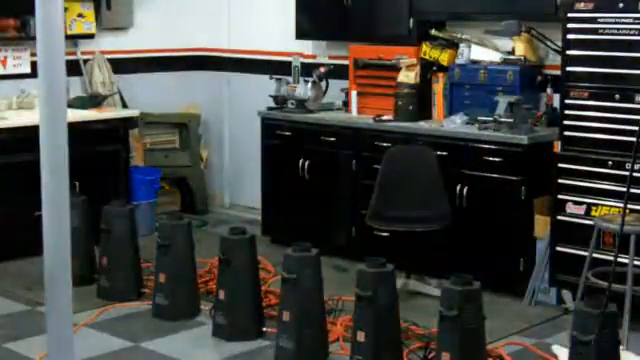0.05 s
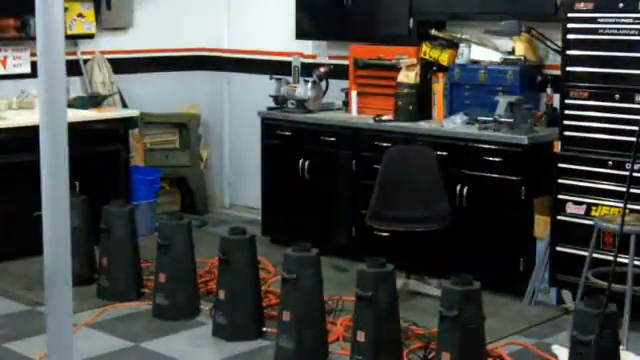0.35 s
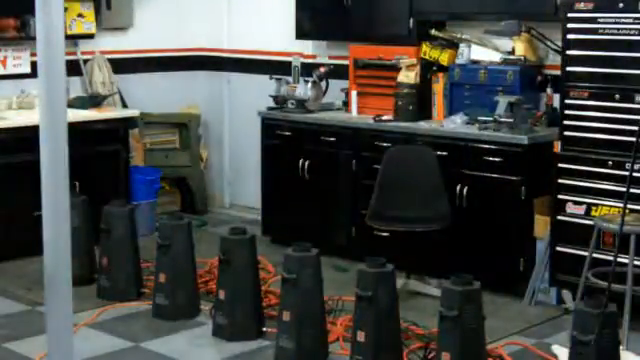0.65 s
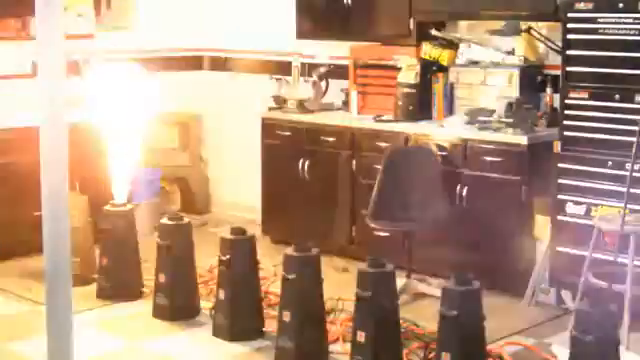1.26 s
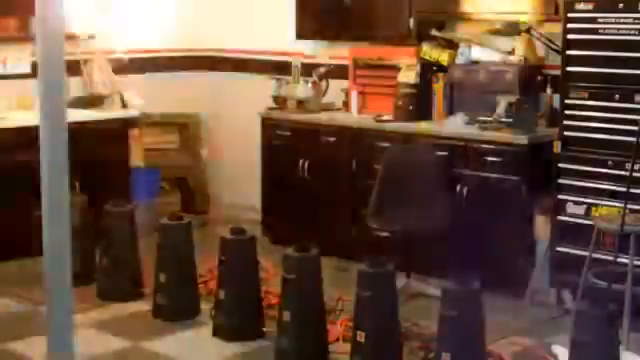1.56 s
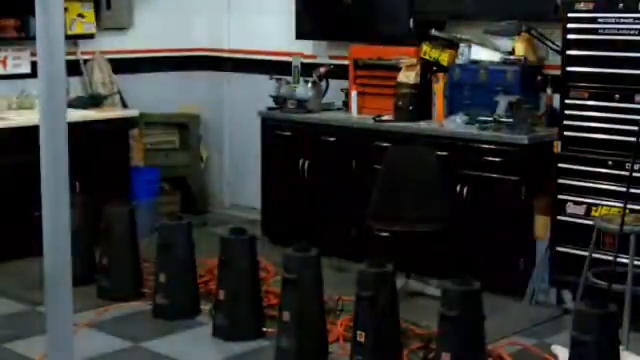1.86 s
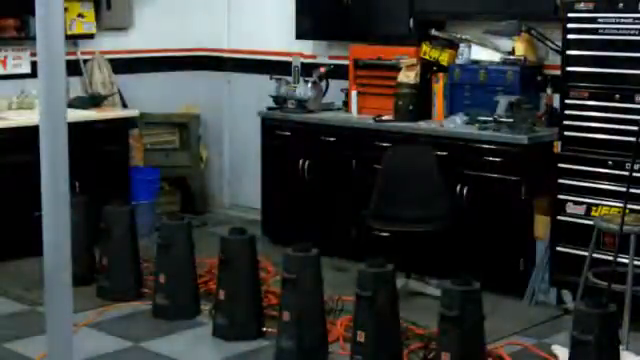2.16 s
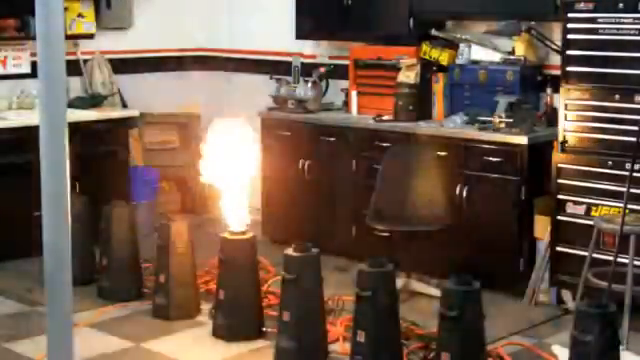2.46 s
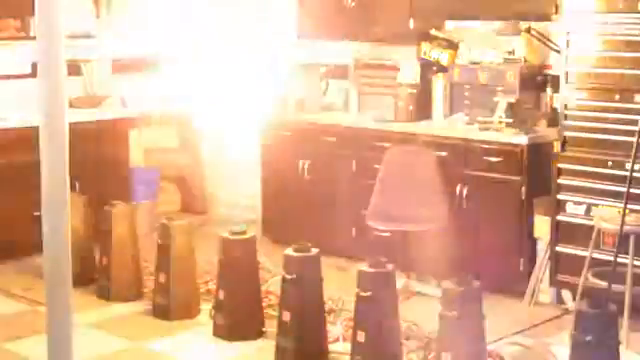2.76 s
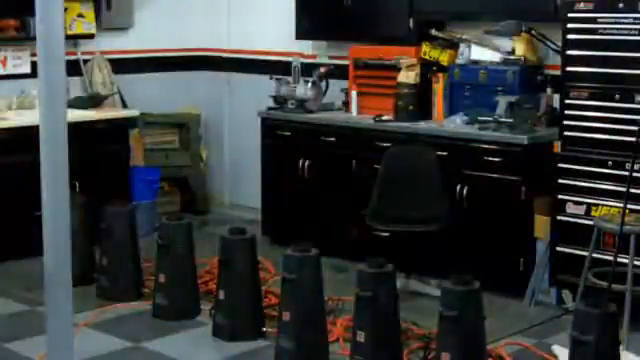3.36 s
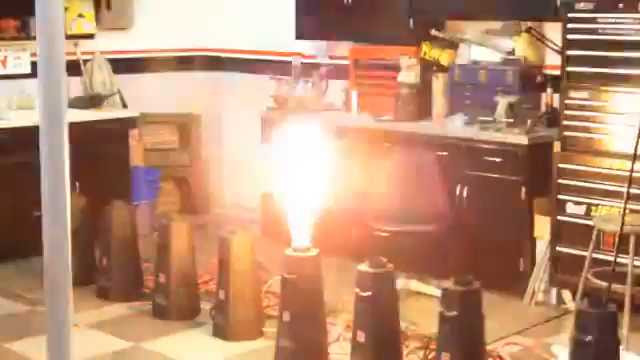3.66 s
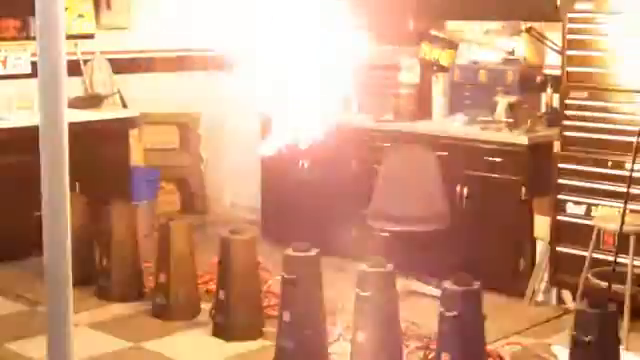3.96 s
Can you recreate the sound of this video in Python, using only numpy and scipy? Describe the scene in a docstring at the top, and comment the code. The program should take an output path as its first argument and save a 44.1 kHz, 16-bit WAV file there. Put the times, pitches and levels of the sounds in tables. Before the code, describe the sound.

Gas flame jets fire three loud, short bursts over low garage hum, at about 1.2, 2.5 and 3.7 seconds, each preceded by soft pilot puffs. Each starts with a spit, pop and thud, then hisses and roars for under half a second, echoing off hard walls. The first two end in brief sputtering hoots, near 1.6 and 2.9 seconds; the second also whistles and leaves faint metal ringing.

```python
"""Three propane flame units fire in turn, centred before the microphone in a hard-walled garage.
A pilot puffs alight; the valve opens with a spit, the jet hisses, and the gas catches with a pop
and a thud, then roars and swells. The first two burner tubes hoot as their flames starve;
the second unit also whistles and leaves its metal ringing.
The walls answer each burst, and a low room hum lies behind it all."""
import sys
import numpy as np
from scipy import signal
from scipy.fft import rfft, irfft
from scipy.io import wavfile

SR = 44100
rng = np.random.default_rng(int(sys.argv[2]) if len(sys.argv) > 2 else 0)


def transcribe(u):
    """Save the signal u as a 16-bit wav file named by the first command-line argument.

    u: samples, shape (n,) or (channels, n), limited to [-1, 1]; the rate is SR.
    q: integer samples, one column per channel.
    """
    v = np.clip(np.atleast_2d(u).T, -1, 1)
    q = np.round(v * 32767).astype(np.int16)
    wavfile.write(sys.argv[1], SR, q)


N = 176400
FLUTTER_HZ, FLUTTER_DB, CRACKLE_HZ, CRACKLE_DB = 42.4, 3.5, 400, 0.5
IGNITE_S = 0.011

# One burst per unit (valve opens [s], valve shuts [s], hiss [dB], spit [dB], rasp [dB], roar [dB],
# rumble [dB], whistle [dB], whump [dB], swell [dB], rise [s], pop [dB], rasp flare [dB])
UNIT_BURSTS = [(1.243, 1.593, -32.5, -22.5, -46, -44, -26, -72, -33.5, -35, 0.007, -32, -7),
               (2.507, 2.861, -32.5, -31, -42, -40, -31.5, -41, -34, -32.5, 0.0053, -39, 7),
               (3.7054, 4.05, -32, -24, -46.5, -41.5, -35.5, -80, -33.5, -71, 0.0048, -33, 13)]
# Spectra of the burning gas (frequency [Hz], level [dB])
ROAR_SPECTRUM = [(60, 2.5), (110, -4), (269, -12), (354, -3.5), (543, -8), (707, -13), (885, -16),
                 (1000, -5.5), (1120, -16), (1250, -15), (1620, -19), (2750, -120)]
RASP_SPECTRUM = [(650, 5.5), (1100, -11.5), (1510, -6), (1640, -4), (2630, -1), (2850, -7), (3440, -6),
                 (4100, -11), (5330, -55), (9020, -120)]
RUMBLE_SPECTRUM = [(8.2, -40), (14, 10.5), (25, 11), (45, -14), (70, -14.5), (97, -13.5), (130, -40.5),
                   (170, -73), (290, -120)]
WHUMP_SPECTRUM = [(40, 3), (95, -1.5), (160, -7), (260, -11.5)]
FIREBALL_SPECTRUM = [(40, -0.5), (130, -5), (190, -9.5), (270, -6.5), (450, -15), (600, -17.5)]
# Resonances of each burner tube under its flame (frequency [Hz], width [Hz], level [dB])
TUBE_1_MODES = [(727, 59, 3.5), (783, 35, -12), (1020, 47, -1)]
TUBE_2_MODES = [(716, 24, -2.5), (820, 18, 0.5), (947, 12.5, 5.5)]
TUBE_3_MODES = [(745, 42, 2), (795, 76, 5), (980, 43, -3)]
# Each fireball at its fullest (time [s], spread [s])
FIREBALL_PEAKS = [(1.59, 0.083), (2.84, 0.1), (4.05, .09)]

def flames():
    """Each flame catches with a whump, roars in its tube, rasps, rumbles and swells into a fireball."""
    linger_s, flare_s, whump_s = 0.056, 0.051, 0.098
    flutter = flicker(FLUTTER_HZ, FLUTTER_DB)
    roar, fireball = coloured(ROAR_SPECTRUM), coloured(FIREBALL_SPECTRUM) * flutter
    rasp = coloured(RASP_SPECTRUM) * flicker(CRACKLE_HZ, CRACKLE_DB)
    rumble, whump = coloured(RUMBLE_SPECTRUM), coloured(WHUMP_SPECTRUM)
    tubes = (TUBE_1_MODES, TUBE_2_MODES, TUBE_3_MODES)
    bright, deep = 0, 0
    for burst, tube, (peak, spread) in zip(UNIT_BURSTS, tubes, FIREBALL_PEAKS):
        start, stop, _, _, rasp_db, roar_db, rumble_db, _, whump_db, swell_db, _, _, flare_db = burst
        age = np.clip(clock() - start, 0, stop - start)
        flare = np.exp(-age / flare_s)
        swell = (clock() > start) / np.cosh((clock() - peak) / spread)
        burner = (roar + undb(-1.5) * resonant(tube)) * flutter
        bright += undb(roar_db + 6 * flare) * gate(start, stop + linger_s, IGNITE_S, fall=0.043) * burner
        bright += undb(rasp_db + flare_db * flare) * gate(start, stop, IGNITE_S, fall=0.089) * rasp
        deep += undb(rumble_db) * gate(start, stop + linger_s, rise=0.0089, fall=0.16) * rumble
        deep += undb(whump_db) * gate(start, start + whump_s, rise=0.041, fall=whump_s) * whump
        deep += undb(swell_db) * swell * fireball
    return bright, deep


# Spectra of the opening spit and of each nozzle's hiss (frequency [Hz], level [dB])
SPIT_SPECTRUM = [(300, 6), (800, 0), (1300, -31), (1900, -5.5), (3700, -18), (4800, -9.5), (6200, 10),
                 (8000, -2.5), (9300, -5), (10600, -0.5), (12300, -19)]
HISS_1_SPECTRUM = [(2760, -23), (4700, -21), (5230, -15.5), (5690, 0), (6040, 4), (6680, -3.5), (7710, -3),
                   (8760, -16), (9720, -19.5), (12200, -19), (15900, -48), (22000, -120)]
HISS_2_SPECTRUM = [(2760, -54), (4700, -15.5), (5000, -19.5), (5270, -5.5), (5850, 1), (7120, -7.5),
                   (7730, 2.5), (9080, -10.5), (10100, -13.5), (12000, -27.5), (15600, -56), (22000, -120)]
HISS_3_SPECTRUM = [(2760, -31), (4700, -16), (5050, -13), (5400, -10), (5850, 2), (6620, -7), (7650, -0.5),
                   (8020, -2.5), (8830, -15), (12200, -26), (15900, -58), (22000, -120)]
# Whistle and ring that all the nozzles share (frequency [Hz], width [Hz], level [dB])
WHISTLE_MODES = [(1696, 28, -3.5), (1970, 20, 4.5), (2080, 120, -8.5), (2770, 70, -5), (3097, 31, -7),
                 (3620, 47, -15)]
NOZZLE_MODES = [(2636, 63, -10), (5945, 79, -3.5), (5940, 59, -13.5), (6130, 24, -0.5), (6420, 63, 1),
                (6950, 29, 3.5), (7500, 51, 3.5), (7870, 38, 3.5)]
# Sharp snaps in the jet as it ignites (time [s], level [dB])
JET_SNAPS = [(1.247, -30), (1.263, -15.5), (2.57, -25), (3.715, -18), (3.7234, -15), (3.752, -33)]

def jets():
    """Gas leaves each nozzle: a spit with snaps, then hiss and whistle that settle with the pressure."""
    surge_db, surge_s, spit_s, snap_s = 5.5, 0.045, 0.014, 0.0005
    spit, whistle = coloured(SPIT_SPECTRUM), resonant(WHISTLE_MODES)
    ring = undb(-4) * resonant(NOZZLE_MODES)
    spray = spit * flicker(CRACKLE_HZ, CRACKLE_DB)
    gas = 0
    for burst, nozzle in zip(UNIT_BURSTS, (HISS_1_SPECTRUM, HISS_2_SPECTRUM, HISS_3_SPECTRUM)):
        start, stop, hiss_db, spit_db, _, _, _, whistle_db, _, _, rise, _, _ = burst
        surge = undb(surge_db * np.exp(-np.maximum(clock() - start, 0) / surge_s))
        flow = gate(start, stop, rise, fall=0.048) * surge
        gas += flow * (undb(hiss_db) * (coloured(nozzle) + ring) + undb(whistle_db) * whistle)
        gas += undb(spit_db) * gate(start, start + spit_s, rise, spit_s) * spray
    snaps = sum(undb(db) * gate(at, at + snap_s, snap_s / 2, snap_s) for at, db in JET_SNAPS)
    return gas * flicker(FLUTTER_HZ, db=0.5) + snaps * spit


# Crack of the gas catching (frequency [Hz], level [dB])
POP_SPECTRUM = [(200, 17), (400, -7.5), (560, -10), (710, -6), (1100, -8.5), (1900, -1.5), (2700, -18.5),
                (3600, -13)]

def ignitions():
    """Each cloud of gas catches with a short pop."""
    pops = sum(undb(pop_db) * gate(start, start + 0.0083, rise, fall=0.029)
               for start, *_, rise, pop_db, _ in UNIT_BURSTS)
    return pops * coloured(POP_SPECTRUM)


# Thuds just after ignition (time [s], frequency [Hz], level [dB])
AIR_THUMPS = [(1.261, 90, -30), (2.53, 63.3, -21.5), (3.765, 96, -22.5)]

def thumps(length_s=0.014):
    """The expanding gas pushes the air, reaching the microphone as a short, deep thud."""
    thuds = 0
    for at, hz, db in AIR_THUMPS:
        envelope = gate(at, at + length_s, rise=length_s / 2, fall=length_s)
        thuds += undb(db) * envelope * np.sin(2 * np.pi * hz * (clock() - at))
    return thuds


# Notes of the burner tubes (time [s], length [s], frequency [Hz], level [dB], throb depth [0-1])
TUBE_HOOTS = [(1.614, 0.025, 767, -32, 0.42), (1.697, 0.046, 802, -43, 0.3),
              (1.745, 0.014, 811.4, -32.5, 0.06), (2.875, 0.031, 770.4, -29, 0.4),
              (2.923, 0.021, 795, -28, 0.4)]

def hoots():
    """The starving flame sputters, so its tube hoots on a throbbing, wavering note."""
    waver_hz, waver_depth, throb_hz = 80.1, 0.0511, 81.3
    drift_s = np.cumsum(waver_depth * wander(waver_hz)) / SR
    notes = 0
    for at, length, hz, db, depth in TUBE_HOOTS:
        age = clock() - at
        throb = 1 - depth * np.cos(2 * np.pi * throb_hz * age)
        tone = np.sin(2 * np.pi * hz * (age + drift_s))
        notes += undb(db) * gate(at, at + length, rise=0.0032, fall=0.019) * throb * tone
    return notes * flicker(FLUTTER_HZ, FLUTTER_DB / 2)


# Pilot flames catching (time [s], decay [s], level [dB])
PILOT_PUFFS = [(0.948, 0.033, -46), (1.07, 0.021, -64), (1.205, 0.032, -60.5), (2.183, 0.035, -54.5),
               (3.356, 0.04, -49), (3.521, 0.048, -50), (3.578, 0.038, -50.5)]
# Spectrum of a puff (frequency [Hz], level [dB])
PILOT_SPECTRUM = [(100, 7), (200, -2.5), (400, 5), (600, 7.5), (1000, 2), (1600, -10.5), (3300, -43),
                  (6000, -86)]

def pilots():
    """Pilot flames puff softly alight ahead of each burst."""
    puffs = sum(undb(db) * gate(at, at + IGNITE_S, rise=0.0038, fall=decay)
                for at, decay, db in PILOT_PUFFS)
    return puffs * coloured(PILOT_SPECTRUM)


# Metal of the second unit (frequency [Hz], time to fall 60 dB [s], level [dB])
METAL_MODES = [(1950, 0.36, -62), (2527, 1.9, -51.5), (2513.5, 1.1, -69), (3074, 1.14, -55.5),
               (10096, 0.33, -66)]

def metal():
    """The jet shakes the second unit's metal, which rings on after the valve shuts."""
    start_s, release_s = UNIT_BURSTS[1][0], 2.94
    ring = 0
    for hz, t60, db in METAL_MODES:
        envelope = gate(start_s, release_s, rise=0.12, fall=t60 / np.log(1000))
        ring += undb(db) * envelope * np.sin(2 * np.pi * hz * clock())
    return ring


# Reverberation of the garage (frequency [Hz], time to fall 60 dB [s])
GARAGE_DECAY = [(100, 1), (800, 0.68), (2500, 0.84), (6000, 0.74), (8000, 0.49), (11000, 0.093)]

def garage(source):
    """The hard walls send a dense tail back to the microphone; it dies sooner in the treble."""
    hz, t60 = np.array(sorted(GARAGE_DECAY), float).T
    white, tail = rfft(rng.standard_normal(N)), 0
    for share, seconds in zip(np.eye(len(hz)), t60):
        decay = np.exp(-np.log(1000) * clock() / seconds)
        band = irfft(white * np.interp(np.log(bins()), np.log(hz), share), N)
        tail += band * decay / np.linalg.norm(decay)
    return undb(-1) * signal.fftconvolve(source, tail)[:N]


# Hum of the garage and self-noise of the microphone (frequency [Hz], level [dB])
ROOM_HUM = [(11, -16.5), (18, -2.5), (22, -8), (32, -20), (51, -11), (71, -9.5), (82, -28), (107, -25),
            (140, -23), (163, -40), (213, -33.5), (259, -37), (290, -34.5), (514, -43.5), (720, -43),
            (940, -34.5), (1120, -41), (1300, -39), (1680, -46.5), (1900, -43.5), (2450, -53),
            (2780, -48.5), (3500, -57), (4550, -150)]
MIC_HISS = [(2760, -113), (4700, -15.5), (5010, -2.5), (5960, 3.5), (6720, -3), (7440, -7), (8290, -11.5),
            (9390, -10.5), (12300, -12.5), (16000, -48), (22000, -120)]
# Faint high ticks in the room (time [s])
ROOM_TICKS = [.12, .22, .615, .725, 1.13, 2.03, 2.221, 3.22, 3.535]

def room_tone():
    """The garage's hum and the microphone's own thin hiss, with a drone and ticks in the centre."""
    hum_db, hiss_db, side_db, tick_s = -47, -69, -14.5, 0.011
    pulses = sum(np.exp(-((clock() - at) / tick_s) ** 2) for at in ROOM_TICKS)
    ticks = undb(-74.5) * pulses * resonant([(9400, 590, 0)])
    drone = undb(-53) * resonant([(69, 4, 0)])
    mid, side = (undb(hum_db) * coloured(ROOM_HUM) + undb(hiss_db) * coloured(MIC_HISS)
                 for _ in range(2))
    return mid + drone + ticks, undb(side_db) * side


def undb(db):
    """Decibels to gain."""
    return 10 ** (np.asarray(db) / 20)


def clock():
    """Time of every sample in seconds."""
    return np.arange(N) / SR


def bins():
    """Frequency of every spectral bin, at least 1 Hz."""
    return np.maximum(np.arange(N // 2 + 1) * SR / N, 1)


def noise(gain):
    """Noise of rms 1, shaped by a gain per bin."""
    x = irfft(rfft(rng.standard_normal(N)) * gain, N)
    return x / np.std(x)


def coloured(points, skirt_db=60):
    """Noise with a (frequency [Hz], level [dB]) spectrum, falling skirt_db an octave past its ends."""
    hz, db = np.array(sorted(points), float).T
    octave, known = np.log2(bins()), np.log2(hz)
    octaves_outside = abs(octave - np.clip(octave, known[0], known[-1]))
    return noise(undb(np.interp(octave, known, db) - skirt_db * octaves_outside))


def resonant(peaks):
    """Turbulence ringing in resonances (frequency [Hz], width [Hz], level [dB])."""
    return noise(sum(undb(db) / (1 + ((bins() - hz) / width) ** 2) for hz, width, db in peaks))


def wander(hz):
    """Random motion of rms 1, mostly slower than hz."""
    return noise(1 / (1 + (bins() / hz) ** 2))


def flicker(hz, db):
    """A random gain of rms 1 that wanders by about db decibels."""
    gain = undb(db * wander(hz))
    return gain / np.sqrt(np.mean(gain ** 2))


def gate(start, stop, rise, fall):
    """Attack from start, hold, and exponential release from stop, all in seconds."""
    attack = 1 - np.exp(-np.maximum(clock() - start, 0) / rise)
    return attack * np.exp(-np.maximum(clock() - stop, 0) / fall)


def scene():
    """The burners stand dead centre, each with its own wall reflections; only room tone has width."""
    roar, rumble = flames()
    fire, hoot = jets() + roar + ignitions() + pilots(), hoots()
    direct = undb(-2.5) * fire + hoot + rumble + thumps() + metal()
    to_walls = fire + undb(-3.5) * hoot
    active_unit = np.searchsorted([start for start, *_ in UNIT_BURSTS[1:]], clock())
    walls = sum(garage(to_walls * (active_unit == unit)) for unit in range(len(UNIT_BURSTS)))
    room, side = room_tone()
    mid = direct + walls + room
    return np.array([mid + side, mid - side])


# Steady offset of the recorder (left [full scale], right [full scale])
CHANNEL_OFFSET = [-.0024, .0344]

def record(dry):
    """The microphone chain: a narrow upper-midrange notch, a steep top cut and an offset per channel."""
    notch_hz, notch_width_hz, top_hz = 4250, 193, 12400
    notch = 1 - np.exp(-((bins() - notch_hz) / notch_width_hz) ** 2)
    notched = irfft(rfft(dry) * notch, N)
    lowpass = signal.ellip(10, .2, 70, top_hz, fs=SR, output="sos")
    return signal.sosfilt(lowpass, notched) + np.array(CHANNEL_OFFSET)[:, None]


dry = scene()
out = record(dry)
transcribe(out)
```